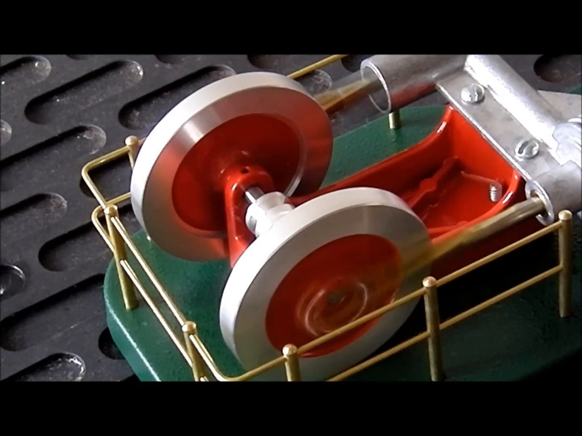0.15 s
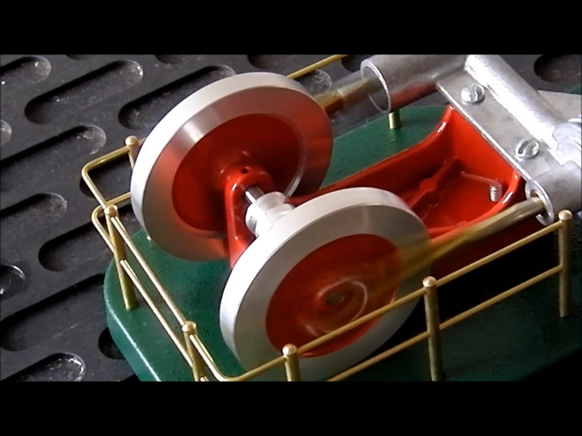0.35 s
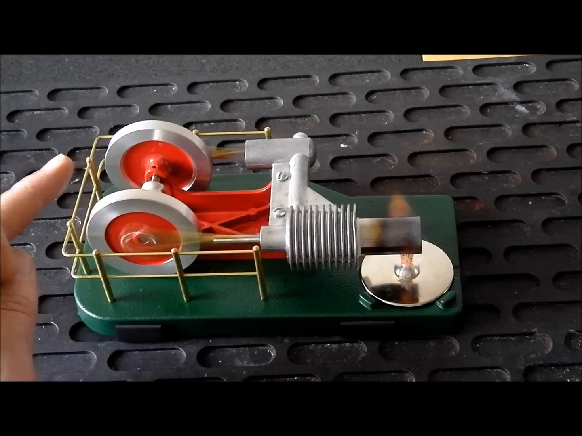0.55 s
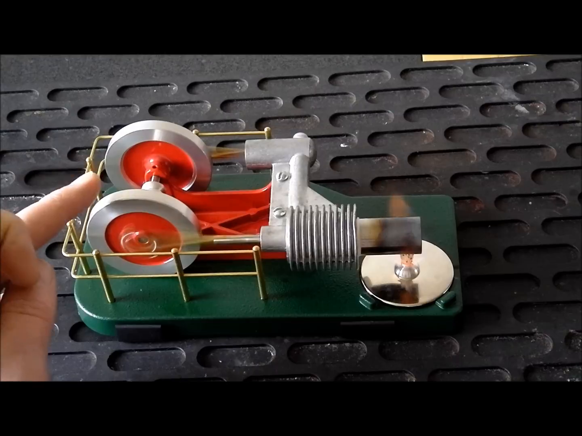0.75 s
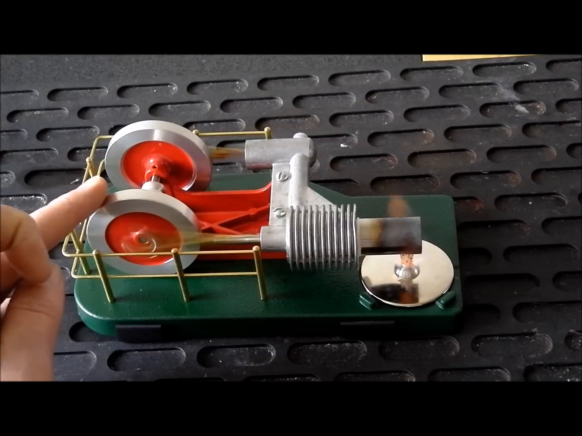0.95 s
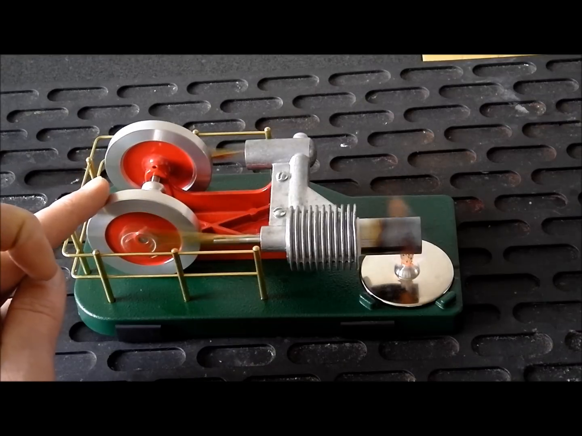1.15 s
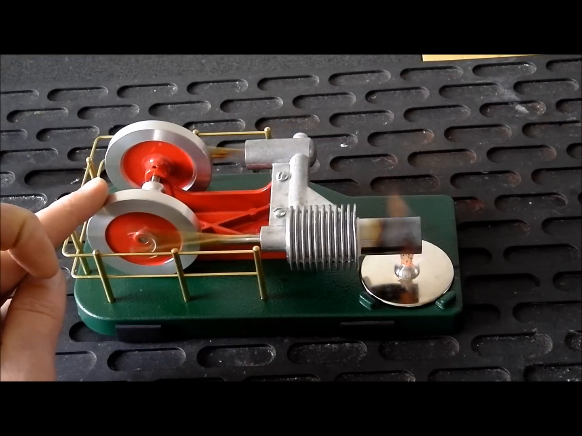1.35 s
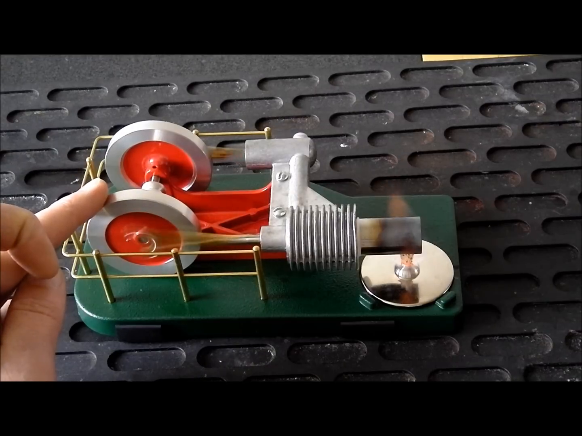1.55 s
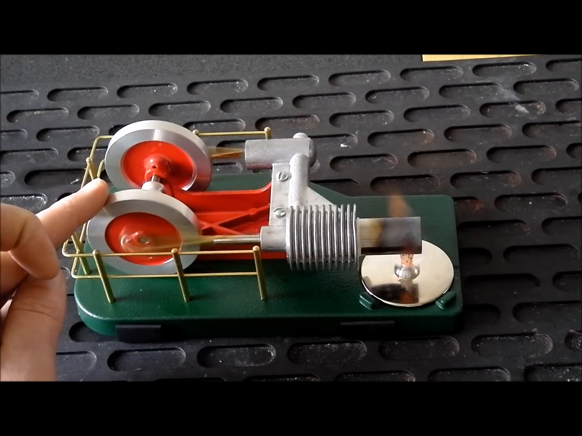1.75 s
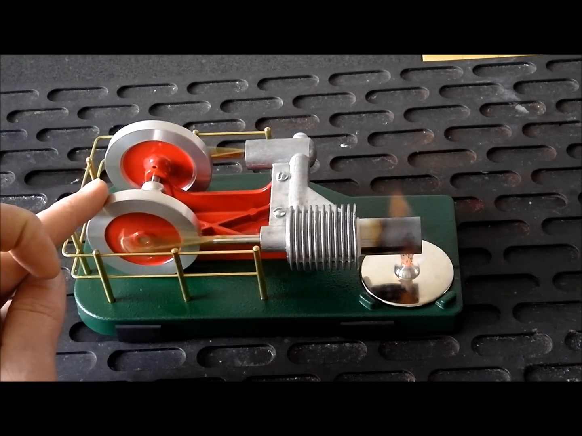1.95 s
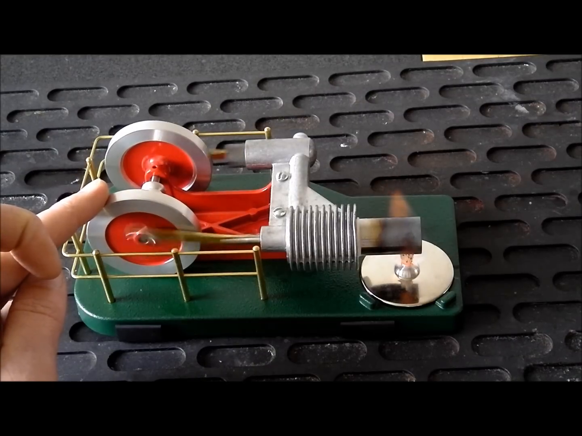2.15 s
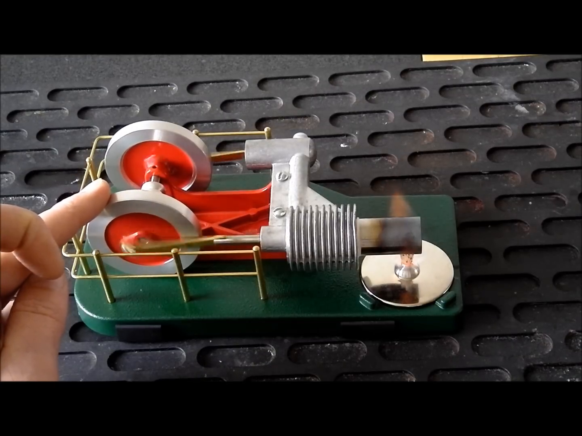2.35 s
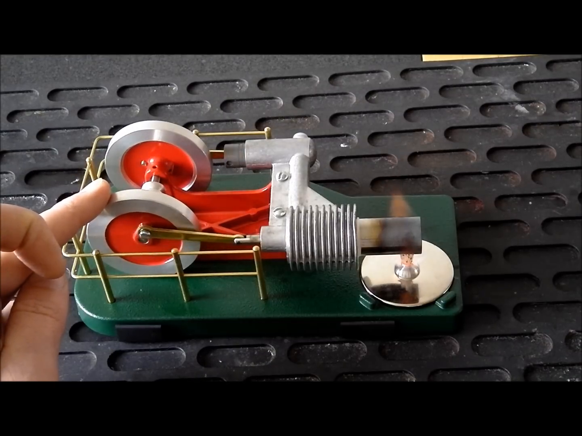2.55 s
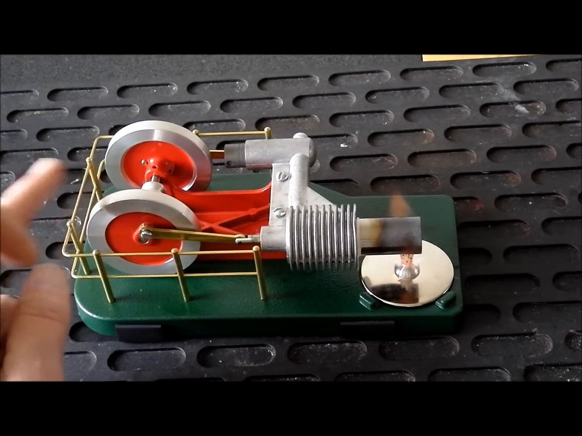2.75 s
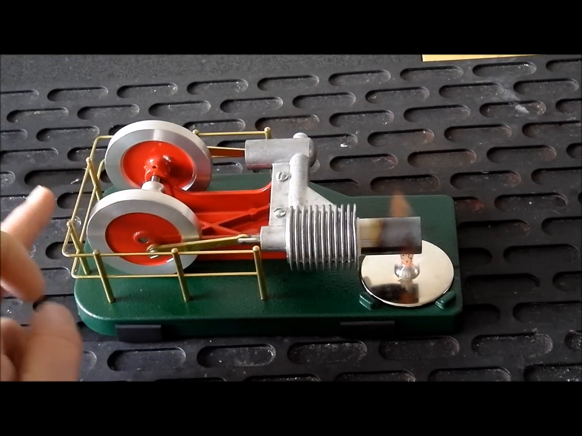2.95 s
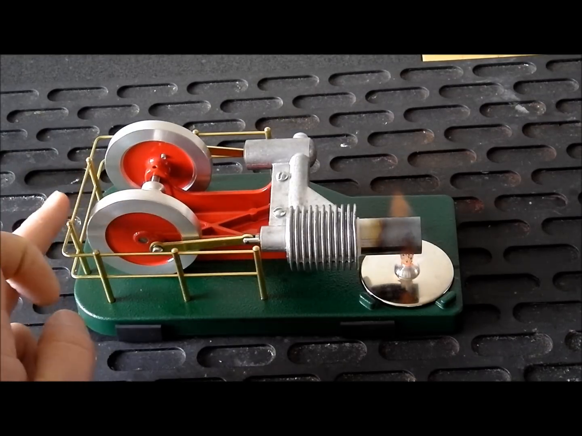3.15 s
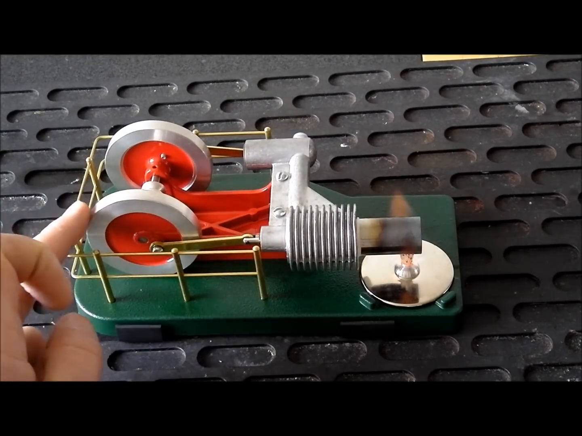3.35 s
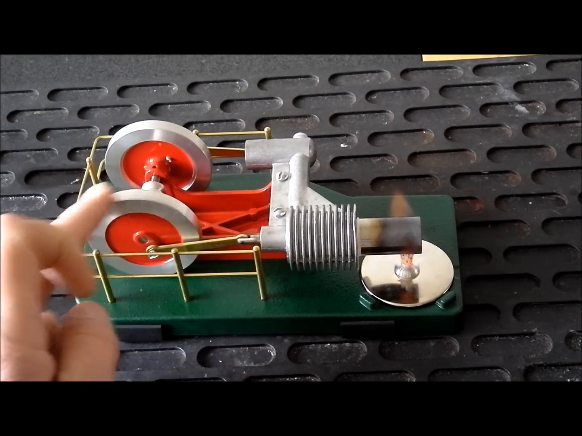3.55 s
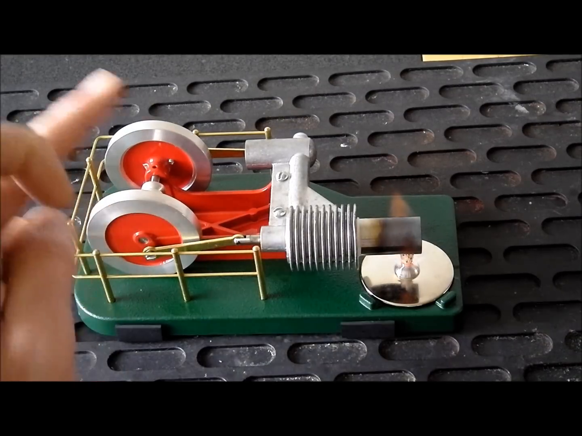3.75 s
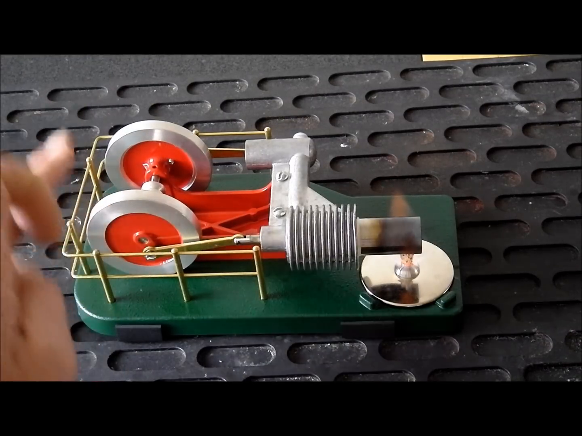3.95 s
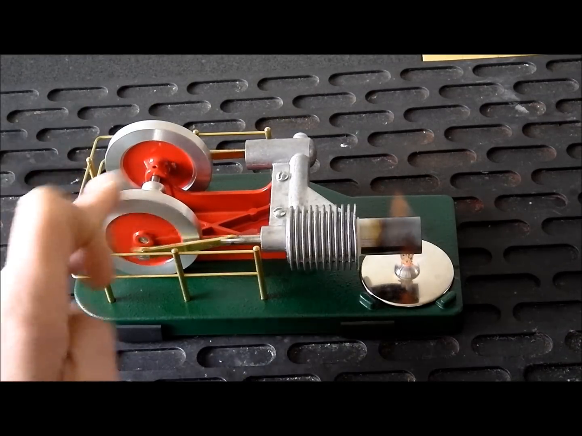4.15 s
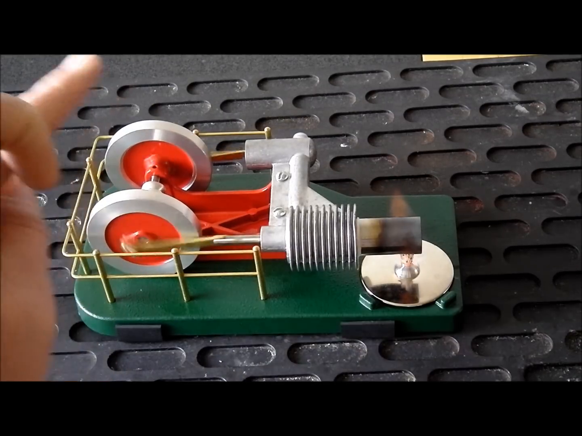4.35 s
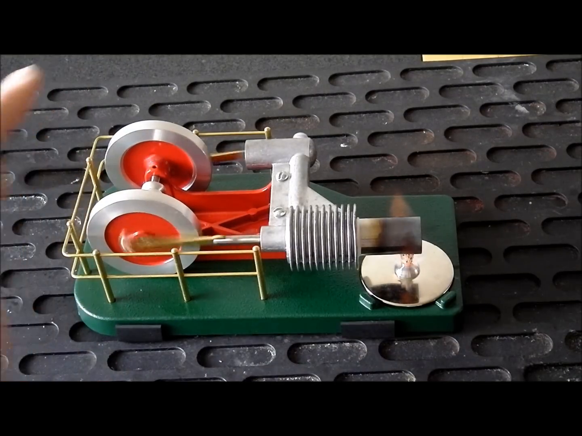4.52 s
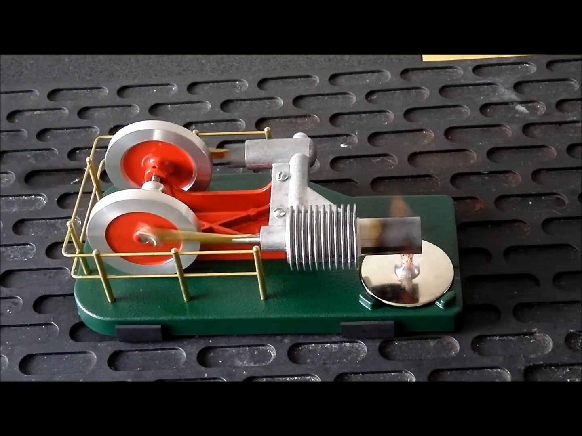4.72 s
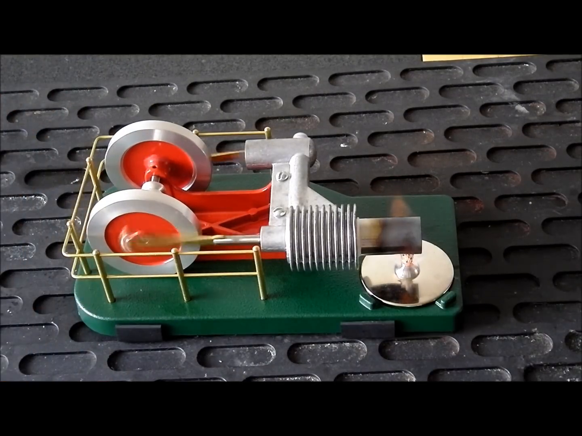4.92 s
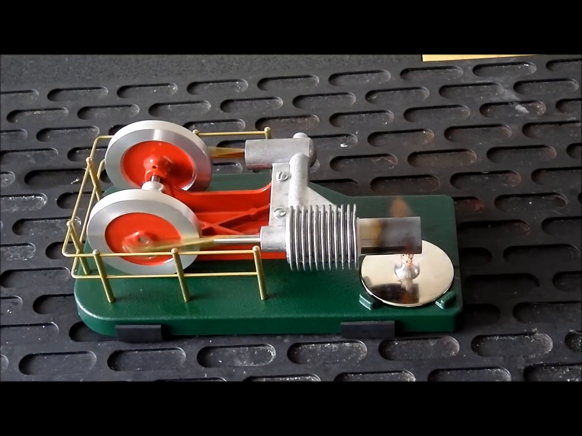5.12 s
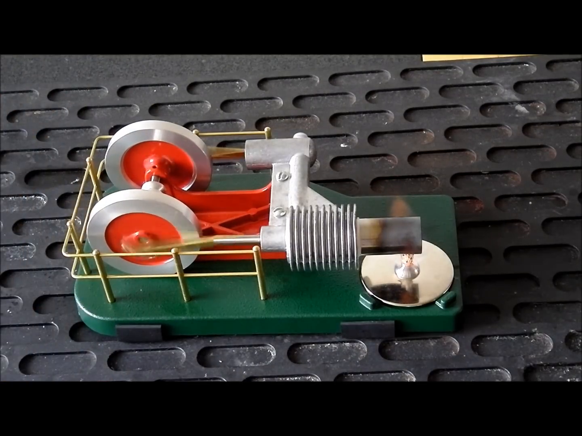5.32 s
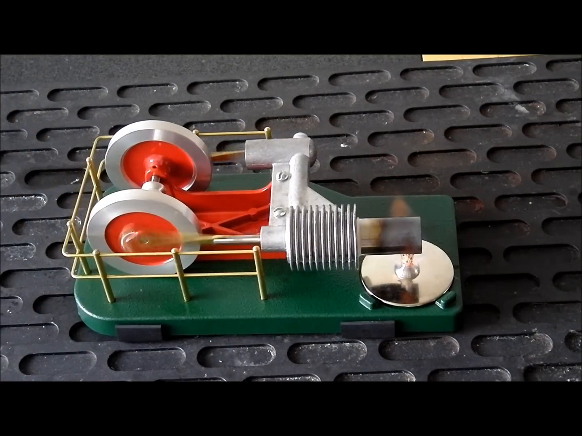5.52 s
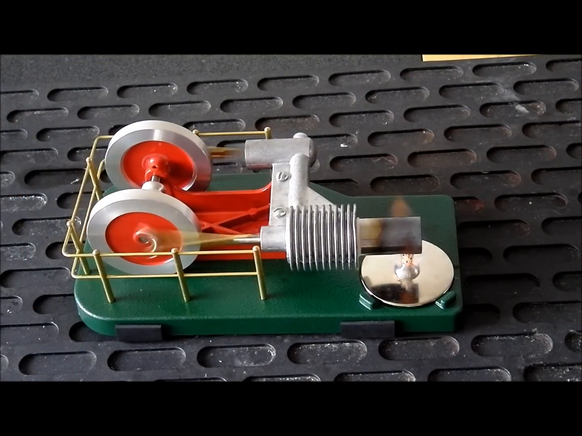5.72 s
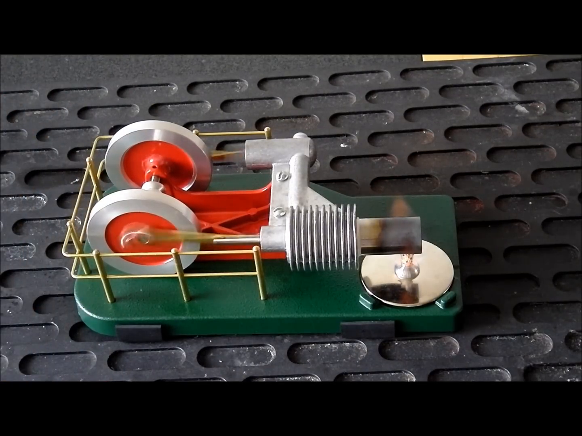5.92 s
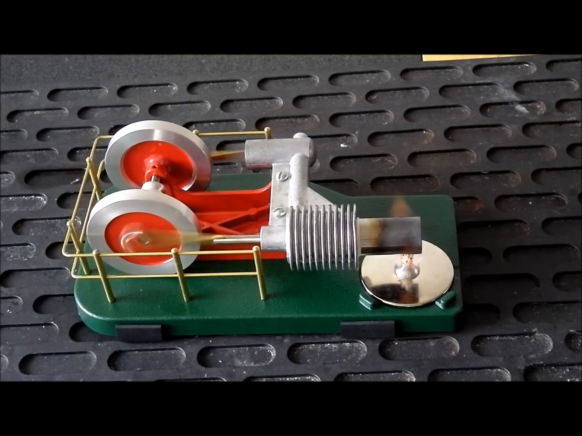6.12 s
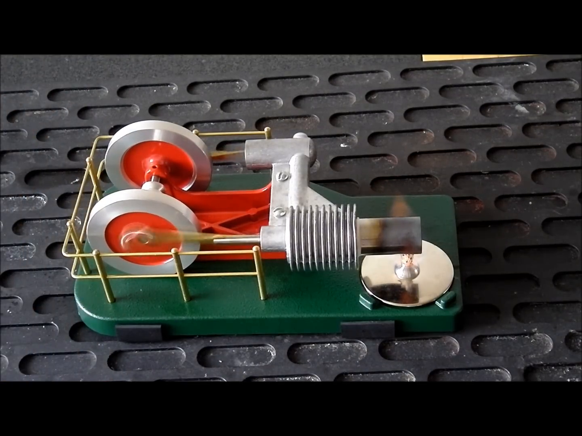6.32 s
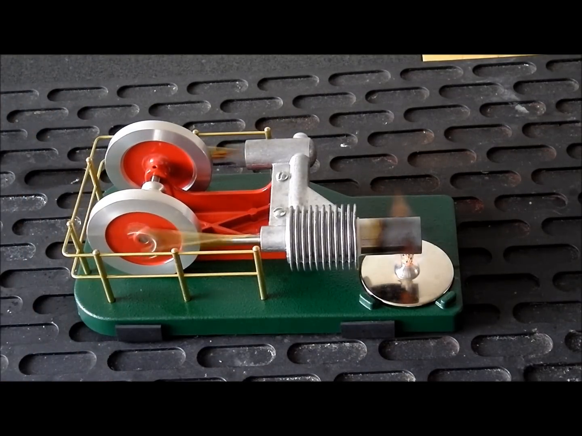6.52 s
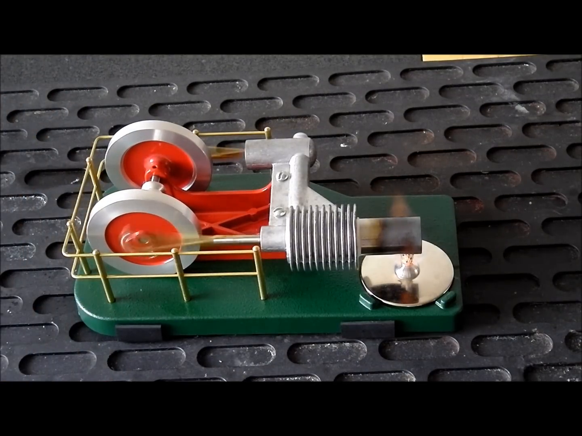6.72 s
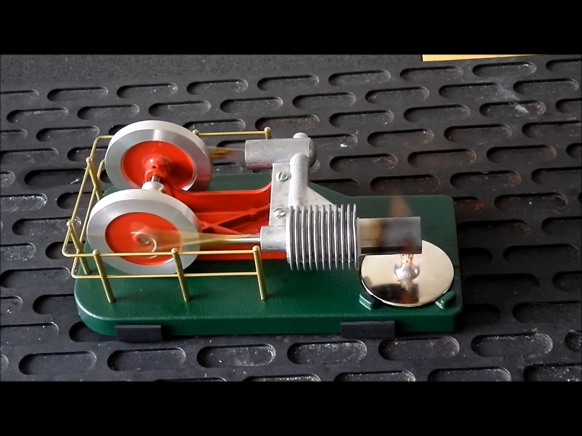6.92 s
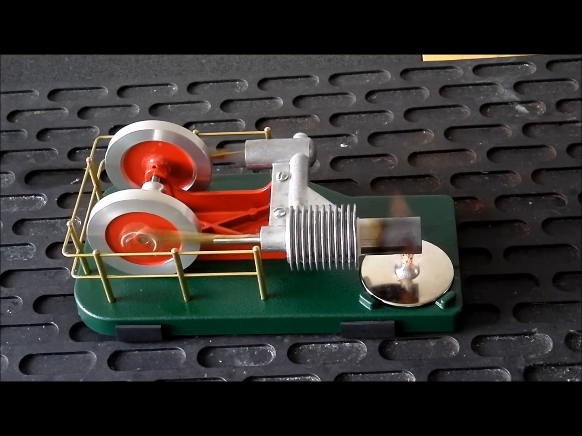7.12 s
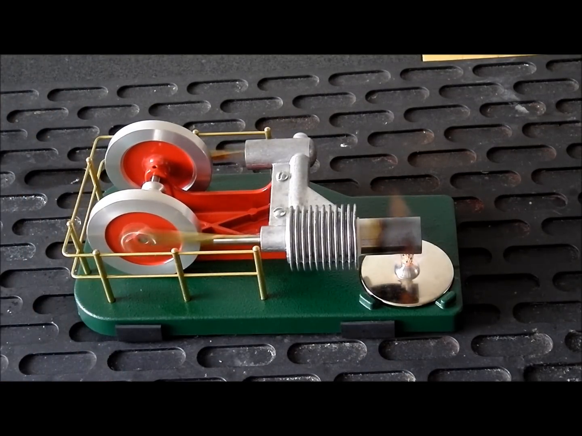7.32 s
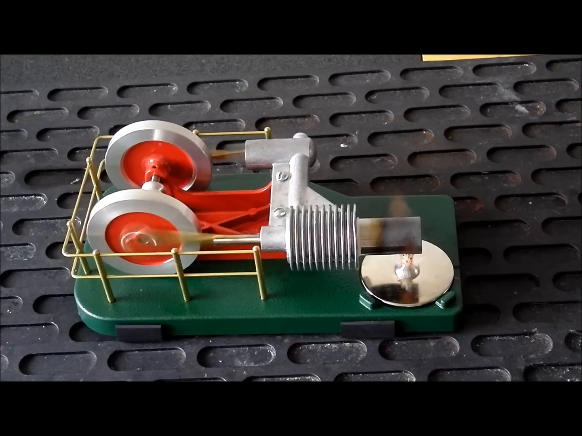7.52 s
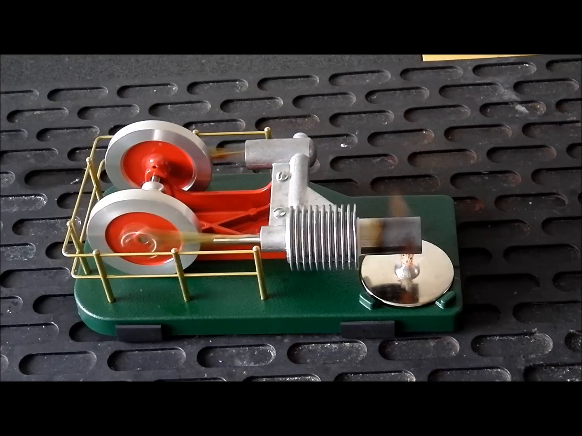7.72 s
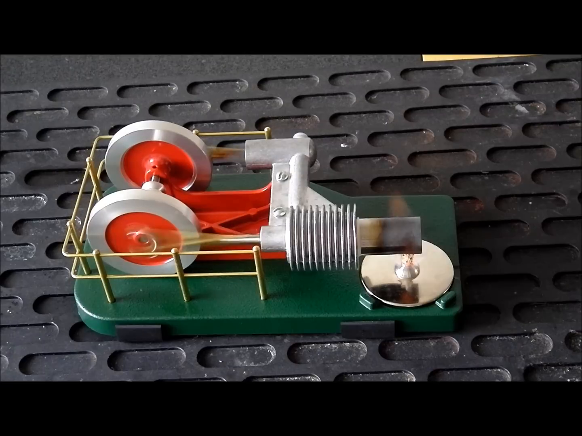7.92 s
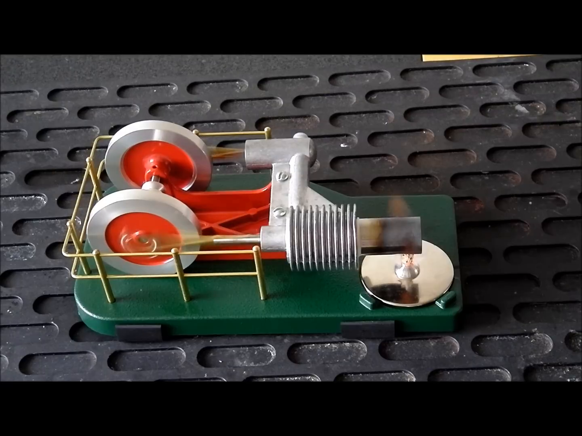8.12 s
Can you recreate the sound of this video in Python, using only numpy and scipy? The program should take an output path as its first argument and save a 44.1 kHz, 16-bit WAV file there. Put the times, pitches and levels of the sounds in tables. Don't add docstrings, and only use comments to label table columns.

```python
import sys
import numpy as np
from scipy import signal
from scipy.fft import rfft, irfft
from scipy.io import wavfile

SR = 44100
rng = np.random.default_rng(int(sys.argv[2]) if len(sys.argv) > 2 else 0)


def persist_wave(psi):
    counts = np.round(np.clip(psi, -1, 1) * 32767).astype(np.int16)
    wavfile.write(sys.argv[1], SR, np.atleast_2d(counts).T)


def how_loud(loudness_db):
    steps = np.asarray(loudness_db, float) / 20
    return 10 ** steps


N = 364707
TIME = np.arange(N) / SR

# mode in Hz, level in dB, t60 in seconds.
RODS = [(3408, -10, 0.01), (3950, -14, 0.017), (4180, -17, 0.029), (4520, -7, 0.0061), (5600, -4, 0.0033),
        (6440, -4.5, 0.0016)]
# mode in Hz, level in dB, t60 in seconds.
TUBE = [(7350, -23, 0.043), (7973, -12.5, 0.063), (8170, -13.5, 0.029), (8240, -21.5, .02)]
# mode in Hz, level in dB, t60 in seconds.
RIM = [(10300, -3, 0.0068), (10510, -9, 0.011), (10850, -6.5, 0.0049), (13500, -9, 0.0037)]
# mode in Hz, level in dB, t60 in seconds.
STAND = [(1635, -5, .07), (1709, 0, .075)]
REST = (46.9, 47.5)
CLAMP_SPEED = 9


def rms_one(x):
    return x / np.sqrt(np.mean(x ** 2) + 1e-20)


def in_time(rows, at=TIME):
    s, *columns = np.transpose(rows)
    return [np.interp(at, s, c) for c in columns]


def shaped(x, points):
    hz, db = np.transpose(points)
    axis = np.maximum(np.arange(N // 2 + 1) * SR / N, 1)
    return irfft(rfft(x) * how_loud(np.interp(np.log(axis), np.log(hz), db)), N)


def noise(points):
    return rms_one(shaped(rng.standard_normal(N), points))


def ring(force, modes):
    out = 0
    for k, (hz, db, t60) in enumerate(modes):
        r, w = how_loud(-60 / (t60 * SR)), 2 * np.pi * hz / SR
        sign = (-1) ** (k * (hz > 1500))
        push = [0, sign * how_loud(db) * np.sin(w)]
        out = out + signal.lfilter(push, [1, -2 * r * np.cos(w), r * r], force + 1e-18)
    return out


def steady_ring(modes):
    return rms_one(ring(rng.standard_normal(N), modes))


def spikes(s, db):
    out, inside = np.zeros(N), (s >= 0) & (s < N / SR)
    np.add.at(out, (s[inside] * SR).astype(int), how_loud(db[inside]))
    return out


def chatter(s, db, length_s, loose):
    r = np.exp(-1 / (length_s * SR))
    hits = spikes(s, db)
    fresh = signal.lfilter([np.sqrt(1 - r * r)], [1, -r], hits) * rng.standard_normal(N)
    habit = rng.standard_normal(300) * r ** np.arange(300)
    habit[0] = 5
    habit /= np.sqrt(np.sum(habit ** 2))
    return loose * fresh + signal.fftconvolve(hits, habit)[:N]


def echoes(x, t60):
    n = int(t60 * SR)
    tail = rng.standard_normal(n) * how_loud(-60 * np.arange(n) / (t60 * SR))
    return signal.fftconvolve(x, tail / np.sqrt(np.sum(tail ** 2)))[:N]


def air():
    # Hz, level in dB per Hz.
    air_spectrum = [(15, -55), (25, -5), (53, -12.5), (116, -13.5), (148, -6.5), (188, -15.5), (260, -16),
                    (750, -22.5), (6080, -33), (7540, -37), (15600, -33)]
    return how_loud(-56) * noise(air_spectrum)


def far_motor():
    # time in seconds, level in dB.
    hum_level = [
        (0, -63),
        (3.0, -95),
        (5.0, -63),
        (8.27, -53.5),
    ]
    return how_loud(in_time(hum_level)[0]) * steady_ring([(47.5, 0, 2.5)])


def whine():
    return how_loud(-79) * steady_ring([(9400, 0, .06), (9830, -15, .06)])


def strokes():
    # peak in seconds, rise in seconds, dull level in dB, bright level in dB.
    rubbing = [(2.948, 0.22, -79, -49), (3.022, 0.011, -79, -54.5), (3.16, 0.03, -50, -70),
               (3.19, 0.065, -56, -70), (3.225, 0.05, -70, -77), (3.612, 0.36, -80, -57),
               (3.652, 0.0093, -66, -64), (3.9, 0.22, -90, -61), (3.963, 0.024, -50, -61),
               (4.0, 0.05, -64, -70), (4.04, 0.05, -67, -70), (4.102, 0.025, -57, -61)]
    s, rise_s, dull, bright = np.transpose(rubbing)[:, :, None]
    shape_db = np.where(TIME < s, 20 * (TIME - s) / rise_s, 210 * (s - TIME))
    return how_loud(dull + shape_db).sum(axis=0), how_loud(bright + shape_db).sum(axis=0)


def rubs():
    low, high = strokes()
    dull = low * noise([(120, -13), (250, 0), (1000, -7.5), (2000, -11.0), (6000, -27.0)])
    return dull + high * noise([(1500, -4.5), (4000, -4.5), (9500, -7.0), (14000, -13.0)])


def squeaks():
    # time in seconds, level in dB.
    squeak_level = [(2.33, -94), (2.37, -62), (2.47, -64), (2.55, -88), (3.54, -88), (3.58, -71),
                    (3.63, -58), (3.66, -98)]
    # time in seconds, level in dB.
    creak_level = [
        (3.47, -95),
        (3.5, -66),
        (3.62, -64),
        (3.66, -95),
    ]
    squeak = how_loud(in_time(squeak_level)[0]) * steady_ring(TUBE[1:])
    return squeak + how_loud(in_time(creak_level)[0]) * steady_ring([(2490, -2, .03), (1930, -4, .02)])


def taps():
    # time in seconds, peak in dB, then base, rods and fins, and stand in dB on top of the peak.
    touches = [(2.786, -43, -5, -27.5, -30), (2.888, -39.5, -10, -15, -20), (2.951, -33, -13, -17, -16),
               (3.023, -35.5, -2, -21.5, -19), (3.153, -44, -5, -25, -30), (3.173, -38.5, 3, -24, -25),
               (3.492, -40, -6, -26, -17), (3.651, -38, -3.5, -30, -15), (3.885, -40, -41, -15, -40),
               (3.955, -48, -8, -20, -30), (4.09, -57, 5, -33, -30), (4.103, -44, 12, -33, -25),
               (4.197, -21.5, 1.5, -30, -38), (4.2018, -31, 1, -30, -29), (4.226, -40, -1, -32, -25),
               (4.248, -34, 3, -30, -25), (4.266, -40, 0.5, -29, -12)]
    # mode in Hz, level in dB, t60 in seconds.
    resting_base = [(493, -15, 0.08), (850, -20, .08), (990, -10, .1), (1069, -1, 0.15), (1130, -1, 0.11),
                    (1183, -6, 0.09), (1364, -12, .12), (1990, -10, 0.044), (2490, -4, .03)]
    s, db, dull, bright, sing = np.transpose(touches)
    soft_push = signal.lfilter([.25], [1, -.75], spikes(s, db + dull - 10.0))
    out = ring(soft_push, resting_base) + ring(spikes(s, db + sing), STAND)
    light_parts = RODS[3:] + [(9160, 0, .002)] + RIM[1:]
    light_parts += [(2900, -9, .003), (4500, -9, .003), (6100, -5, .003), (8050, -24, .05)]
    return out + ring(chatter(s, db + bright + 19, .0003, loose=.2), light_parts)


def fingers():
    return taps() + rubs() + squeaks()


def crank():
    # time in seconds, speed in turns per s.
    steady = [(0, 23.706), (.5014, 23.706)]
    # time in seconds, speed in turns per s.
    braking = [
        (.5088, 23.75),
        (1.05, 23.65),
        (1.569, 18.75),
        (2.049, 12.94),
        (2.271, 9.1),
        (2.5, 0),
    ]
    # time in seconds, speed in turns per s.
    run_up = [(4.2, 6.9), (4.27, 4.85), (4.34, 5.896), (4.6, 6.911), (5, 8.697), (5.4, 10.794),
              (5.8, 13.108), (6.2, 15.213), (6.6, 17.036), (7, 18.596), (7.3, 19.58), (7.6, 20.468),
              (7.9, 21.146), (8.28, 21.726)]
    start_turns = (.114, 12, 47.469)
    rate, at, turns = np.zeros(N), [], []
    for start, rows in zip(start_turns, (steady, braking, run_up)):
        on = (TIME >= rows[0][0]) & (TIME < rows[-1][0])
        rate[on] = in_time(rows, TIME[on])[0]
        at = np.append(at, TIME[on])
        turns = np.append(turns, start + np.cumsum(rate[on]) / SR)
    return rate, np.interp(TIME, at, turns)


def running(rate, turn):
    blow = -29.5 + 28 * np.log10(np.maximum(rate, 7) / 22)
    slow = np.clip((14.7 - rate) / 6.9, 0, 1)
    braked = turn < REST[1]
    slack = slow * np.where(braked, 0.86, 1)
    bright = -5 + 6 * slack + 2 * braked
    shaking, hiss = -12 + 2.5 * slack, -1.5 + 3 * slack
    rattle, soft = -4 * slow, -1.5 * slack
    return blow, bright, shaking, hiss, rattle, soft


def each_turn(braked, free):
    rows = []
    for k in range(107):
        rows += [(k + c[0], *c[1:]) for c in braked if k + c[0] < REST[0]]
        rows += [(k + c[0], *c[1:]) for c in free if k + c[0] > REST[1]]
    return np.array(rows).T


def moments(when, turn):
    return np.interp(when, turn, TIME, left=-1, right=-1)


def off_speed(s, rate, best):
    return 1.3 * np.abs(np.maximum(np.interp(s, TIME, rate), CLAMP_SPEED) - best)


def mat(rate, turn, level_db, moving):
    # part of turn, turns per s at which it hits hardest, deep level in dB, hollow level in dB.
    braked_thuds = [(.0, 23, -4, 8), (.14, 23, -6, 6), (.47, 23, 8, -6), (.47, 13, 13, -6), (.6, 19, -6, 9),
                    (.73, 10, -6, 10), (.33, 23, -6, 5), (.95, 22, -6, 6), (.4, 10, 2, 8)]
    # part of turn, turns per s at which it hits hardest, deep level in dB, hollow level in dB.
    free_thuds = [(.0, 22, -4, 8), (.4, 10, 12, 2), (.5, 15, 10, -6), (.44, 22, 9, 2), (.61, 10, -6, 11),
                  (.6, 17, -6, 12), (.15, 21, 0, 6), (.75, 18, 5, 5)]
    # deep mode in Hz, level in dB, t60 in seconds.
    deep_modes = [(100, -1, 0.11), (133.7, 5.5, 0.21), (212.5, -6, 0.2), (280.4, -6, 0.24)]
    # hollow mode in Hz, level in dB, t60 in seconds.
    hollow_modes = [(334.5, -16.5, 0.62), (407, -9, 0.18), (475, -0.5, 0.072), (592, 7.5, 0.029),
                    (656.6, 5, 0.14), (697, 0, 0.042), (803, 8, 0.04)]
    when, best, deep, hollow = each_turn(braked_thuds, free_thuds)
    s = moments(when, turn)
    db = np.interp(s, TIME, level_db) - off_speed(s, rate, best)
    chance = .9 * rng.standard_normal((len(s), 2))
    tremble = moving * how_loud(level_db) * rng.standard_normal(N)
    out = ring(spikes(s, db + deep + chance[:, 0] - 12.5) + how_loud(-44.5) * tremble, deep_modes)
    return out + ring(spikes(s, db + hollow + chance[:, 1] - 11.0) + how_loud(-38) * tremble, hollow_modes)


def stand(rate, turn, level_db, rattle):
    # part of turn, turns per s at which it hits hardest, level in dB.
    braked_sings = [(.0, 23, 9), (.43, 22, 4), (.45, 15, 8), (.62, 17, 3), (.77, 10, 5)]
    # part of turn, turns per s at which it hits hardest, level in dB.
    free_sings = [(.0, 22, 5), (.38, 22, 6), (.4, 9, 2), (.58, 18, 7), (.6, 11, 2), (.7, 13, 5), (.9, 9, 0)]
    when, best, db = each_turn(braked_sings, free_sings)
    s = moments(when, turn)
    db = db + np.interp(s, TIME, level_db) - off_speed(s, rate, best)
    chance = 1.5 * rng.standard_normal(len(s))
    return ring(spikes(s, db + chance - 5.0) + how_loud(-25) * rattle, STAND)


def pistons(turn, level_db, moving):
    # Hz, level in dB per Hz.
    slide_spectrum = [(3000, -0.5), (4600, -7), (7000, -9.5), (9200, -6.5), (10500, -2.5), (11800, -11),
                      (13600, -8), (15500, -22)]
    stroke_db = 3.5 * np.cos(2 * np.pi * (turn - .12)) + 1.5 * np.cos(4 * np.pi * (turn - .1))
    return moving * how_loud(level_db + stroke_db - 8.0) * noise(slide_spectrum)


def contacts(rate, turn):
    # part of turn, turns per s at which it hits hardest, dB into base, dB into light parts,
    # light part hit (1 bracket, 2 rods, 3 tube, 4 fins, 5 rim).
    braked_knocks = [(.005, 23, 13, 11, 1), (.12, 20, 6, 4, 4), (.285, 14, 1, 12, 2), (.285, 22, -2, 6, 2),
                     (.41, 12, 14, 11, 4), (.41, 21, 9, 10, 1), (.41, 22, -4, 13, 3), (.41, 15, -4, 13, 3),
                     (.465, 22, 1, 11, 4), (.465, 23, -4, 9, 2), (.6, 18, 8, 2, 1), (.62, 23, -4, 6, 4),
                     (.77, 16, 8, 6, 1), (.77, 9, 9, 12, 1), (.5, 8, 12, 8, 1), (.94, 23, 5, 13, 5),
                     (.96, 23, -4, 11, 3), (.94, 16, -4, 9, 5), (.45, 23, -4, 9, 5), (.7, 23, 5, 2, 1)]
    # part of turn, turns per s at which it hits hardest, dB into base, dB into light parts,
    # light part hit (1 bracket, 2 rods, 3 tube, 4 fins, 5 rim).
    free_knocks = [(.005, 23, 15.5, 5, 1), (.11, 22, 6, 1, 4), (.255, 8, 1, 12, 2), (.255, 8, -4, 10, 4),
                   (.255, 19, -1, 8, 2), (.375, 10, 10, 10, 1), (.64, 9, 7, 8, 1), (.375, 19, 4, 14, 3),
                   (.375, 21, -4, 8, 1), (.41, 11, 10, 11, 3), (.41, 22, 2, 6, 3), (.47, 21, 1, 11, 4),
                   (.58, 16, 9, 5, 1), (.7, 9, 8, 12, 1), (.69, 9, -4, 9, 2), (.7, 14, 7, 11, 2),
                   (.7, 14, -4, 9, 4), (.91, 9, 6, 4, 2), (.92, 21, -3, 6, 5), (.93, 9, -4, 7, 5),
                   (.93, 14, -4, 10, 5), (.4, 9, -4, 7, 5), (.965, 24, 11, -4, 1), (.985, 25, 16, -4, 1),
                   (.6, 18, 3, 7, 1)]
    when, best, base, light, hit = each_turn(braked_knocks, free_knocks)
    chance = rng.standard_normal((len(when), 8))
    s = moments(when + .0018 * chance[:, 0], turn)
    light_part, hit = np.arange(1, 6), hit[:, None]
    along = light[:, None] - 4 * np.abs(light_part - hit)
    along -= 4 * ((light_part == 3) != (hit == 3))
    db = np.column_stack([base, along]) - off_speed(s, rate, best)[:, None]
    db = np.maximum(db, -4)
    return s, 1.25 * db + .9 * (chance[:, 1:2] + chance[:, 2:])


def swell(force):
    return signal.sosfilt(signal.butter(2, [940, 1350], "band", fs=SR, output="sos"), force)


def engine():
    # mode in Hz, level in dB, t60 in seconds.
    base_modes = [(853, -7, 0.032), (870, -14, 0.034), (970, -10, 0.11), (990, -24.5, 0.04),
                  (1065, -5, .055), (1125, 0.5, 0.04), (1187, -7.5, 0.034), (1257, -13.5, 0.085),
                  (1293, -6, 0.047), (1387, -7, .05), (1430, -9, 0.07)]
    # mode in Hz, level in dB, t60 in seconds.
    bracket_modes = [(2026, -5.5, 0.016), (2324, -3, 0.014), (2483, 0, 0.014), (2635, -1.5, 0.0097),
                     (2850, -1, 0.0059)]
    # mode in Hz, level in dB, t60 in seconds.
    fin_modes = [(8340, -11, 0.0047), (8950, -1.5, 0.0041), (9230, -2.5, 0.0078), (9370, -10.5, 0.0097)]
    loose_shares = (.06, .25, .3, .35, .3, .3)
    braked_part_db = (1.4, 1.5, 0.5, -0.5, 0, 1.5)
    rattles_db = (-14, -13, -11, -25, -14, -16)
    bursts_s = (.00015, .0003, .0009, .0008, .001, .001)
    # (modes, how far the part follows brightness, dB)
    parts = ((base_modes, 0, -7.5), (bracket_modes, 0, -3.5), (RODS, 1, 3.0),
             (TUBE, 0.6, 2.5), (fin_modes, 1, 4.0), (RIM, 0.6, -4.0))
    rate, turn = crank()
    s, db = contacts(rate, turn)
    level, brightness, shaking, hiss, rattle, soft = running(rate, turn)
    blow, bright = (np.interp(s, TIME, c) for c in (level, brightness))
    lag = np.exp(-1 / (0.028 * SR))
    moving = np.clip(rate / 3, 0, 1)
    moving = np.maximum(moving, signal.lfilter([1 - lag], [1, -lag], moving))
    out = mat(rate, turn, level + shaking, moving)
    for k, (modes, high, part_db) in enumerate(parts):
        knocks = chatter(s, blow + db[:, k] + high * bright, bursts_s[k], loose_shares[k])
        grains = (rng.random(N) < 2500 / SR) * rng.standard_normal(N)
        force = knocks + moving * how_loud(level + high * brightness + rattle + rattles_db[k]) * grains
        if k == 0:
            force = how_loud(soft) * swell(force)
        out = out + how_loud(part_db + braked_part_db[k] * (turn < REST[1])) * ring(force, modes)
    out = out + stand(rate, turn, level, moving * how_loud(level + rattle) * grains)
    out = out + pistons(turn, level + hiss, moving)
    return signal.lfilter(*signal.iirnotch(7860, 40, SR), out)


def scene():
    # Hz, side minus mid in dB.
    stereo_width = [(60, -25), (150, -23.5), (380, -20.5), (950, -20.5), (2380, -14.5), (5980, -6.5),
                    (15000, -9)]
    small = signal.butter(2, 90, "high", fs=SR, output="sos")
    near = signal.sosfilt(small, engine() + fingers())
    hum = far_motor()
    room = how_loud(-17) * echoes(near, .3)
    mid = whine() + near + room + air() + hum
    side = shaped(echoes(near + hum, 0.35) + how_loud(10.5) * air(), stereo_width)
    return np.array([mid + side, mid - side])


def drop_out():
    cut_s, back_s = 0.4803, .5475
    fade_db = np.where(TIME > back_s - 0.01, -31, -7 - 1362 * (TIME - cut_s))
    return how_loud(np.where((TIME > cut_s) & (TIME < back_s), fade_db, 0))


def top_cut(x):
    return signal.sosfilt(signal.butter(12, 15750, fs=SR, output="sos"), x)


def record(dry):
    top = signal.cheby2(16, 45, 15850, fs=SR, output="sos")
    return top_cut(signal.sosfilt(top, dry * drop_out()))


dry = scene()
out = record(dry)
persist_wave(out)
```